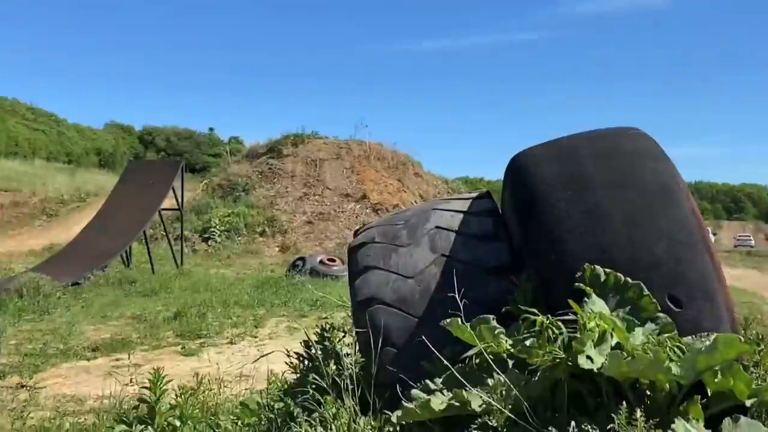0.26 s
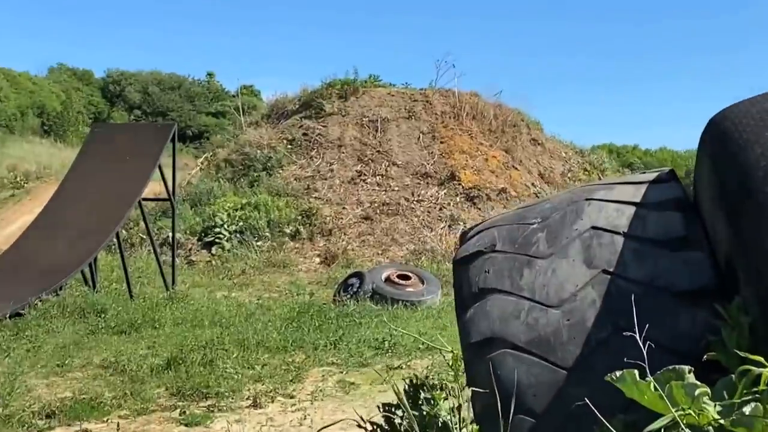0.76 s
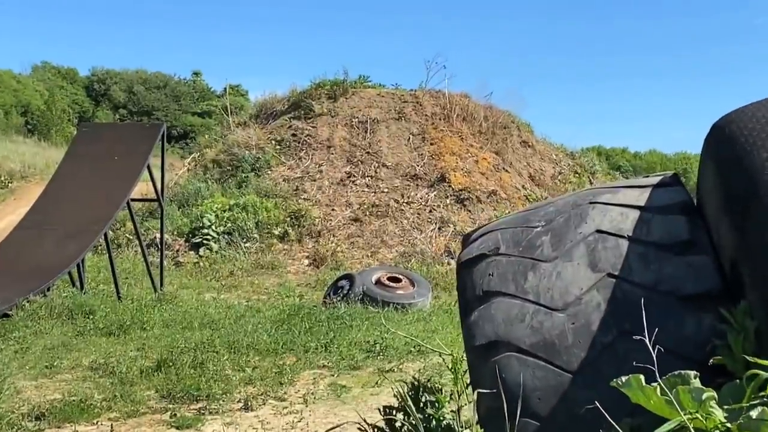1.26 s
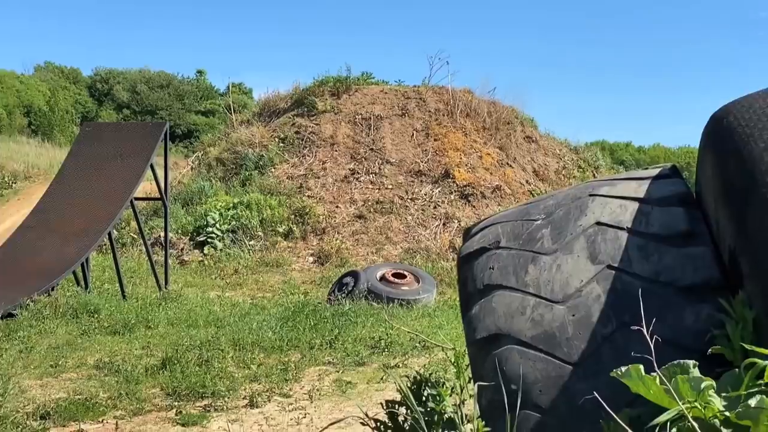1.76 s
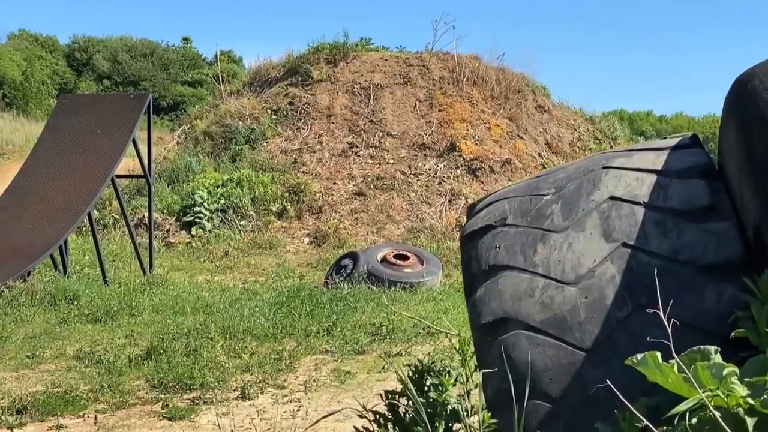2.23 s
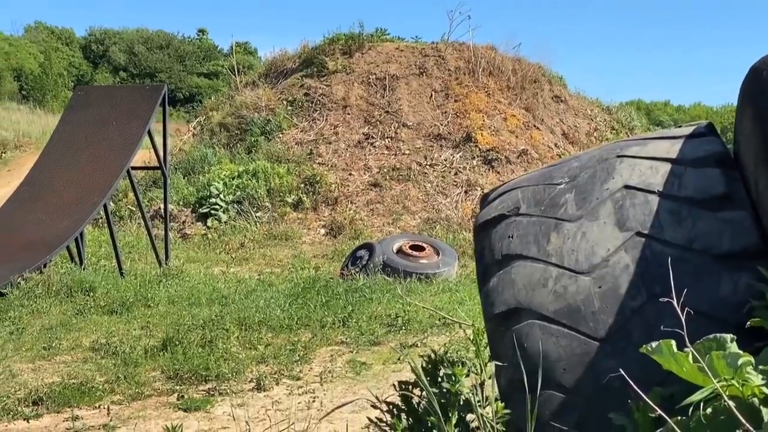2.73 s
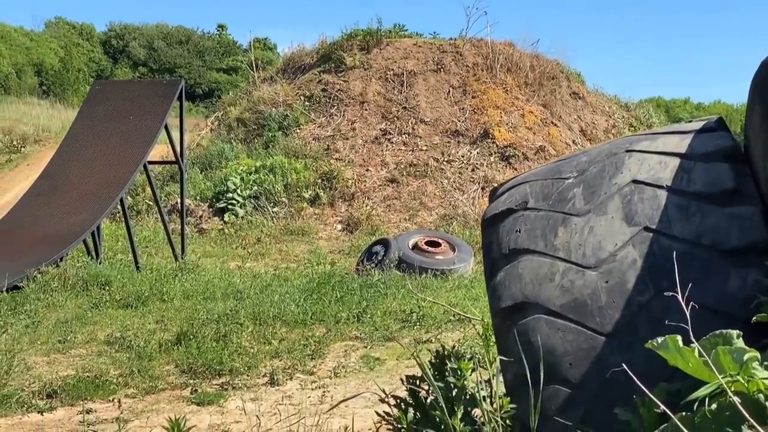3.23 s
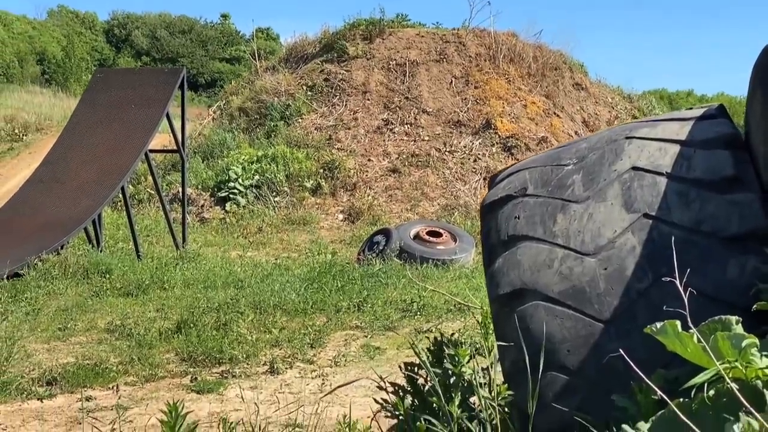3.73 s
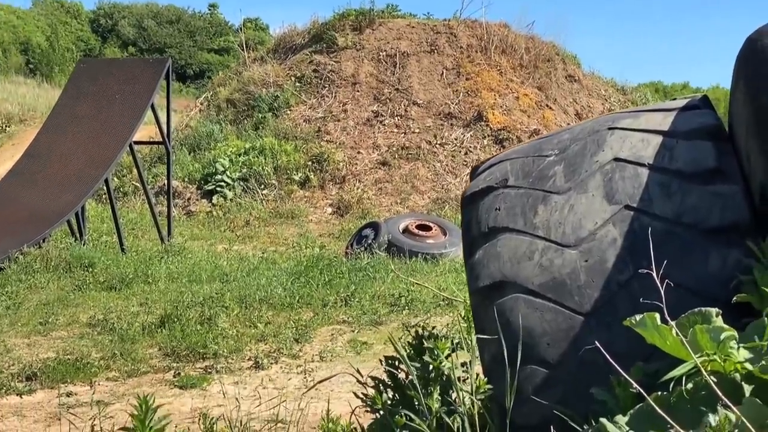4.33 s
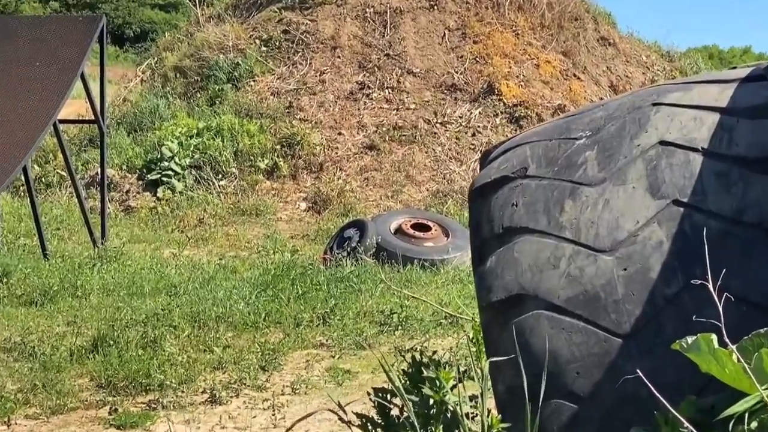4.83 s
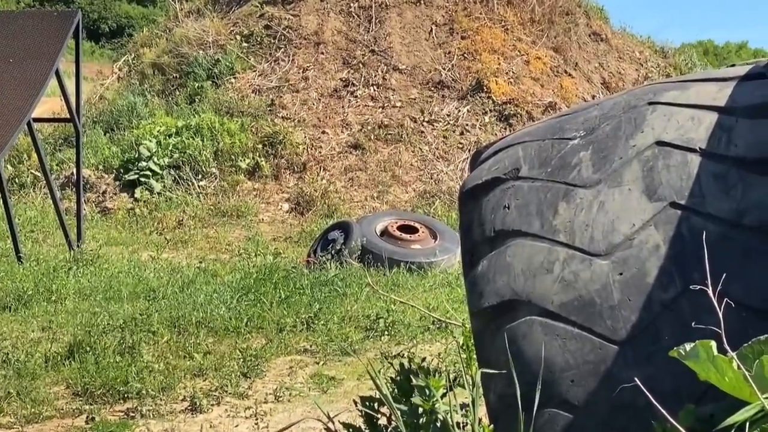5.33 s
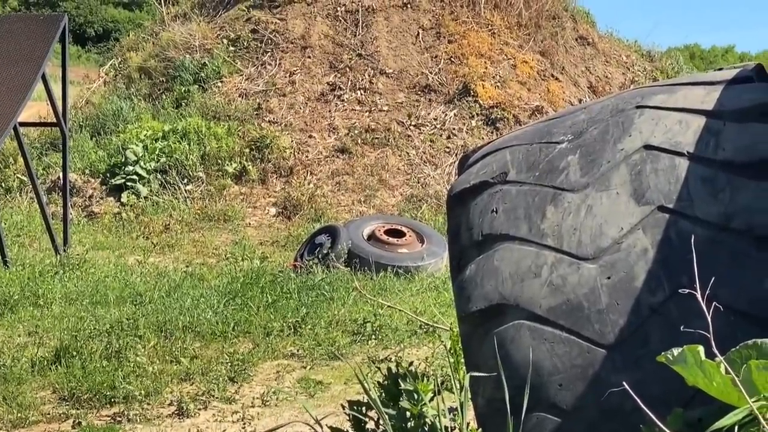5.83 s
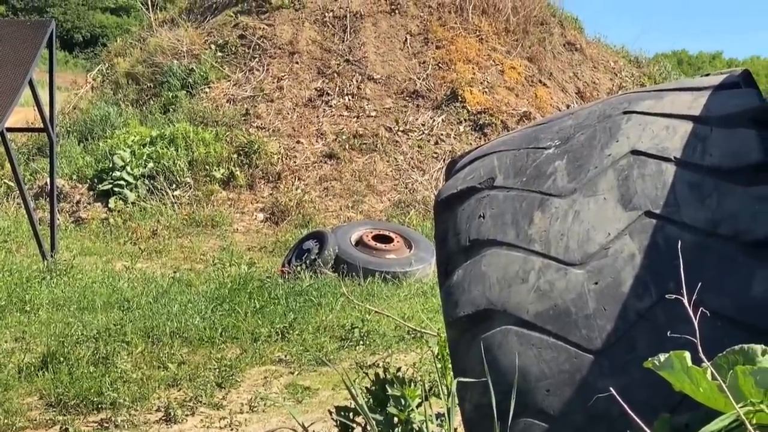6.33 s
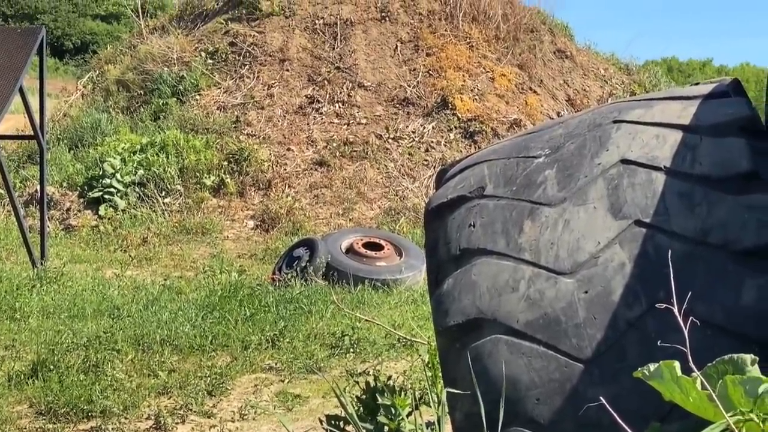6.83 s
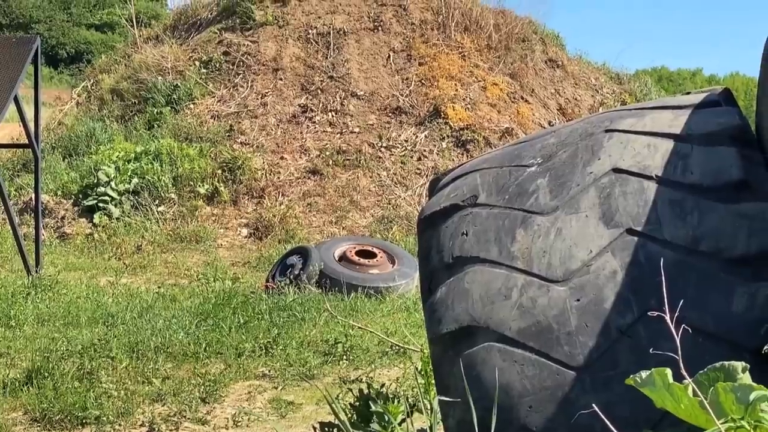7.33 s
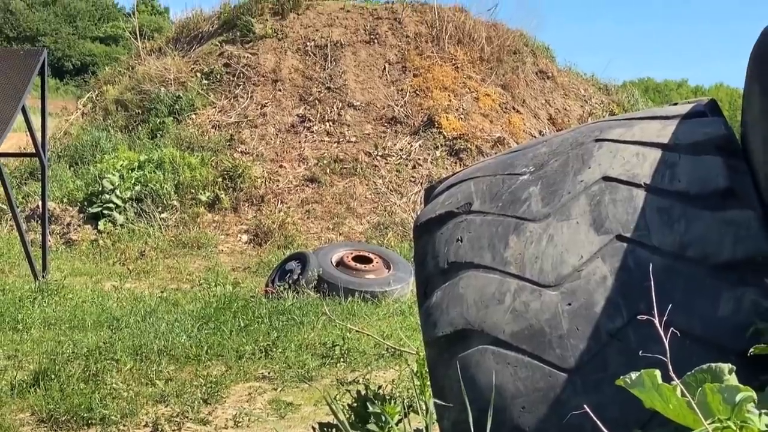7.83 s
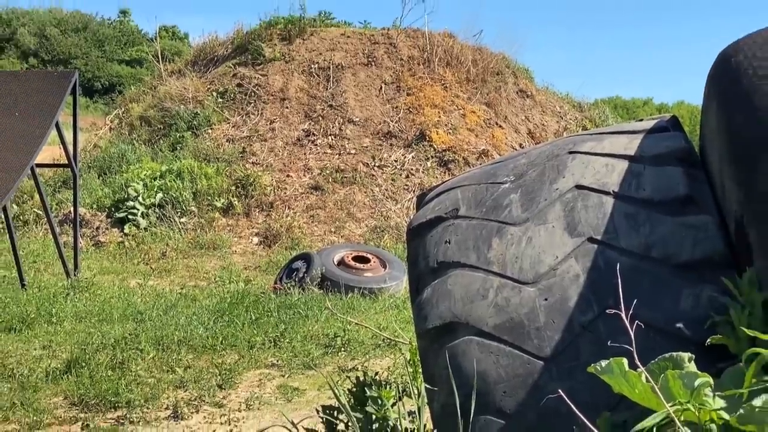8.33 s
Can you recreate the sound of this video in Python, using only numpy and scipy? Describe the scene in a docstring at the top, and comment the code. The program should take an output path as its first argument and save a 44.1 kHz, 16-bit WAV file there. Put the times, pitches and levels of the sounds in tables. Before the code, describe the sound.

In the open air, compressed air hisses through a hose and valve into a large tire. The hiss begins weaker, surges by 0.4 seconds, dips near 0.8, then swells again around 1.3. It is bright and fizzy, with narrow, wavering whistles; a shrill ring leads until about 1.5 seconds, then a lower one takes over as the fitting settles. The flow eases near 3 seconds, recovers by 4, and keeps fluctuating to the end at about 8.6. Behind, a small compressor engine runs steadily at about seventeen cycles a second: metallic knocking, soft exhaust puffs, gear whirr and a low drone. Clatter swells slightly near 1.4; exhaust fades briefly around 6. Wind buffets the microphone with low thumps, strongest near 1.1 seconds, again around 4.6 to 5, and lightly after 7. Wide stereo, dry, no echo.

```python
"""Outdoors, compressed air hisses through a hose and valve into a tire.
One flow drives the jet noise and its rings in the narrow fittings; the fizzy top has its own level curve.
A shrill ring leads at first, then gives way to a lower one as the chuck settles.
The compressor's small engine idles behind: a knock and three exhaust puffs in every cycle.
A few gusts and single eddies buffet the microphones."""
import sys
import numpy as np
from scipy import signal
from scipy.fft import rfft, irfft, next_fast_len
from scipy.io import wavfile
from scipy.ndimage import uniform_filter1d, map_coordinates

SR = 44100
rng = np.random.default_rng(int(sys.argv[2]) if len(sys.argv) > 2 else 0)


def waveform_to_disk(signal):
    """Save audio, clipped to [-1, 1], as 16-bit WAV at the path in sys.argv[1]."""
    frames = np.transpose(np.atleast_2d(signal))
    scaled = np.clip(frames, -1, 1) * 32767
    samples = np.round(scaled).astype(np.int16)
    wavfile.write(sys.argv[1], SR, samples)


N = 378378

# Levels in spectra and resonances are relative unless a comment says otherwise.
# air flow and the fine top of its hiss: time_s, flow_db, treble_db (before FIZZ_DB)
AIR_FLOW = [(0.0, -33.5, -37), (0.4, -21.5, -24.5), (0.48, -22.5, -28.5), (0.76, -27.5, -31),
            (1.31, -23.5, -26.5), (1.48, -25.5, -31.5), (1.79, -24, -27), (2.51, -24.5, -28),
            (2.96, -29.5, -36), (3.94, -25.5, -30), (4.23, -25.5, -31.5), (4.37, -25, -27),
            (4.63, -26.5, -35), (4.97, -28, -31), (5.78, -26, -32), (5.9, -27.5, -35), (6.21, -25, -28.5),
            (6.33, -29, -34), (7.45, -25.5, -30.5), (7.72, -28, -36.5), (7.93, -26, -31.5),
            (8.58, -27.5, -30)]
# broad jet noise: freq_hz, level_db
JET_SPECTRUM = [(1500, -35), (2600, -15), (3300, -4), (4200, -1.5), (5500, 0.5), (7100, -2.5), (7750, -2),
                (8250, -7), (11000, -22), (16000, -40)]
# fine top of the hiss: freq_hz, level_db
FIZZ_SPECTRUM = [(6000, -35), (8200, -5.5), (8800, -2.5), (9200, 0.5), (9700, -2.5), (10300, -1),
                 (11150, -0.5), (11350, -1), (11820, 3.5), (12200, 1.5), (13300, -4), (14100, -6.5),
                 (15000, -9.5), (15800, -16.5)]
# ring of the valve bore, moving as the chuck settles: time_s, pitch_hz
BORE_PITCH = [(0, 5730), (1.2, 5670), (1.7, 5670), (4, 5617), (8.58, 5660)]
# fixed resonances of the fittings: centre_hz, width_hz, level_db
FITTING_MODES = [(3320, 130, -12), (4160, 120, -3), (5130, 130, -1), (5260, 60, -5), (6070, 100, -1),
                 (6250, 110, -1), (6410, 130, -1), (6850, 180, -8)]
# level of the independent hiss that widens the stereo: freq_hz, level_db
STEREO_SPREAD = [(2500, -50), (3400, -27), (4500, -10), (6000, -8), (7200, -20), (9000, -11), (13000, -10),
                 (15500, -22)]

# engine speed: time_s, cycles_per_s
ENGINE_SPEED = [(0.0, 17.28), (0.6, 17.33), (1.3, 17.11), (2.0, 17.3), (2.6, 17.19), (3.3, 17.23),
                (4.0, 17.22), (4.7, 17.25), (5.4, 17.36), (6.1, 17.33), (6.8, 17.15), (7.5, 17.26),
                (8.58, 17.28)]
# exhaust puffs within one cycle: share_of_cycle, level_db
EXHAUST_PUFFS = [(.01, 8.5), (.23, 4), (0.631, -1.5)]
# muffler response: freq_hz, level_db
MUFFLER_SPECTRUM = [(20, -46), (35, -27), (55, -5), (85, 1), (145, -0.5), (185, -6), (240, -18), (330, -15),
                    (430, -32.5), (900, -53.5)]
# engine block resonances: centre_hz, half_width_hz (6 dB down), level_db
BLOCK_MODES = [(716, 150, -6), (895, 145, 10), (1134, 260, 0)]
# engine cover resonances: centre_hz, half_width_hz (6 dB down), level_db
COVER_MODES = [(1840, 145, 1), (2233, 115, 1), (2880, 500, -2)]
# steady whirr of gears and fan: freq_hz, level_db
WHIRR_SPECTRUM = [(25, -30), (60, 4), (200, 2), (320, 2), (390, -1.5), (500, -5.5), (720, 3), (950, 0),
                  (1250, 2), (1500, -7.5), (1850, -2), (2600, -6), (5000, -12.5)]
# boom of the housing: centre_hz, width_hz, level_db
HOUSING_MODES = [(197, 64, 1), (290.4, 47, 2), (415, 28, -7)]
# early swell of the clatter: middle_s, half_width_s, change_db
CLATTER_SWELL = (1.37, 1.0, 2.9)
# brief fade of the exhaust: middle_s, half_width_s, change_db
EXHAUST_FADE = (6.02, .5, -9.5)
# swells of the housing drone: middle_s, half_width_s, change_db
HOUSING_SWELLS = [(.4, .7, 5.5), (5.65, 0.42, 6.5)]

# single eddies that thump the microphone: start_s, level_db, starting pitch_hz, rise_s
EDDIES = [(0.544, -24, 101, .015), (0.744, -25, 86, 0.013), (0.928, -20.5, 148, 0.011),
          (1.071, -21, 125, 0.0061), (1.1035, -18, 470, .0045), (1.106, -11, 244, 0.0061),
          (1.236, -23.5, 230, .0077), (4.62, -29.5, 380, 0.0082), (4.826, -21.5, 128, 0.014),
          (4.85, -24, 248, .008), (5.046, -22, 157, .0096), (7, -24, 162, 0.012),
          (7.48, -21.5, 129, 0.0072)]
# gusts on the microphone: start_s (of the hold), length_s, level_db
GUST_EVENTS = [(0, 0.68, -37), (.97, .43, -31.5), (2.6, .06, -46), (4.577, 0.53, -33), (7.1, .63, -35.5),
               (8.05, .5, -44.5)]
# low wind buffeting: freq_hz, level_db
RUMBLE_SPECTRUM = [(18, -28), (35, -4.5), (62, 2), (110, 0.5), (190, -7.5), (330, -23), (600, -37),
                   (1500, -68)]
# stereo phase, left ahead of right: freq_hz, phase_rad
STEREO_PHASE = [(60, 0), (400, .7), (900, 1.7), (1150, 1), (1480, 1.2), (1720, .15), (2000, 0), (2750, 0),
                (3300, .2), (4000, .3), (4900, .7), (5450, 0), (5950, -.8), (6550, 0), (7850, 0), (8150, 2),
                (9200, 1.8), (10200, .7), (10600, 0), (11100, 0), (13200, -3), (14300, -3.6), (14600, -4.8),
                (15200, -6.28)]

USUAL_FLOW_DB = -26.5
# each part of the hiss: level at the usual flow, and dB gained per dB of flow
JET_DB, JET_GROWS = -31.6, 0.7
FITTINGS_DB, FITTINGS_GROWS = -33.5, 1.15
BORE_DB, BORE_GROWS = -34.5, 0.7
LOWER_DB, LOWER_GROWS = -33.5, 1.25
UPPER_DB, UPPER_GROWS = -35, 0.75
FIZZ_DB = 2.07  # added to treble_db
# the chuck settles; while loose, the upper ring is stronger and the other rings weaker
SETTLE_S, SETTLE_TAKES_S = 1.5, 0.11
LOOSE_UPPER_DB, LOOSE_LOWER_DB, LOOSE_OTHERS_DB = 4.5, -7, -2.5
# engine levels before their swells
KNOCK_DB, EXHAUST_DB, DRONE_DB = -42.8, -38.7, -50.5
GUST_ATTACK_S, GUST_RELEASE_S, BREEZE_DB = 0.18, 0.14, -49.5
TOP_HZ = 15750


def air():
    """The turbulent jet hisses and excites narrow resonances of valve and chuck, each growing with the flow."""
    strength_db, treble_db = curves(AIR_FLOW)
    flow_db = strength_db - USUAL_FLOW_DB
    loose = 0.5 - 0.5 * np.tanh((np.arange(N) / SR - SETTLE_S) / SETTLE_TAKES_S)
    rings, fittings = fitting_rings(flow_db, loose)
    # moving air makes the highest hiss swell and fade
    fading_db = 0.88 * wobble(10)
    jet = amp(JET_DB + JET_GROWS * flow_db) * noise(JET_SPECTRUM)
    fizz = amp(FIZZ_DB + treble_db + fading_db) * noise(FIZZ_SPECTRUM)
    # broad colour shifts first, then narrow patches that come and go like thin whistles
    shifting = patchy(jet + fizz + fittings, depth_db=1.35, size=(12, 20))
    hiss = patchy(shifting + rings, depth_db=2.0, size=(2, 16))
    flutter = amp(0.29 * wobble(25) + 0.3 * wobble(130))
    return flutter * hiss


def fitting_rings(flow_db, loose):
    """Narrow passages ring under the flow: three wavering whistles, and a cluster of fixed resonances."""
    bore_hz, = curves(BORE_PITCH)
    upper_hz = 4845 * bore_hz / bore_hz.mean()  # moves in step with the bore
    lower_db = LOWER_DB + LOWER_GROWS * flow_db + LOOSE_LOWER_DB * loose
    upper_db = UPPER_DB + UPPER_GROWS * flow_db + LOOSE_UPPER_DB * loose
    bore_db = BORE_DB + BORE_GROWS * flow_db + LOOSE_OTHERS_DB * loose
    fittings_db = FITTINGS_DB + FITTINGS_GROWS * flow_db + LOOSE_OTHERS_DB * loose
    lower = amp(lower_db) * whistle(4480, width=206, waver=20)
    upper = amp(upper_db) * whistle(upper_hz, width=170, waver=20)
    bore = amp(bore_db) * whistle(bore_hz, width=235, waver=20)
    return lower + upper + bore, amp(fittings_db) * ringing_noise(FITTING_MODES)


def engine():
    """Knocking metal, exhaust puffs and a droning housing make up the compressor's engine."""
    return machinery() + exhaust() + housing_drone()


def machinery():
    """Combustion knocks the block, then the covers, over a whirr of gears and fan."""
    block_blows = strokes(-0.085, scatter_db=1.0, jitter=0.008)
    cover_blows = strokes(-0.055, scatter_db=1.3, jitter=0.008)
    block_hits = rattle(block_blows, rattle_db=-19.5, t60=0.027, tail_db=-3.5, tail_t60=0.11)
    cover_hits = rattle(cover_blows, rattle_db=-19.5, t60=0.04, tail_db=-2.5, tail_t60=0.15)
    knock = amp(-4.5) * ringing(block_hits, BLOCK_MODES) + amp(-5.0) * ringing(cover_hits, COVER_MODES)
    whirr = amp(1) * patchy(noise(WHIRR_SPECTRUM), depth_db=0.97, size=(3, 30))
    whine = amp(-13) * whistle(328, width=7.8, waver=0.89)
    return amp(KNOCK_DB + swell(*CLATTER_SWELL)) * (knock + whirr + whine)


def exhaust():
    """Three pressure puffs per cycle pass through the muffler, which rings after each."""
    puffs = sum(amp(db) * strokes(share, scatter_db=1.1, jitter=0.004) for share, db in EXHAUST_PUFFS)
    muffled = unit(filtered(puffs, lambda hz: causal(MUFFLER_SPECTRUM, hz)))
    return amp(EXHAUST_DB + swell(*EXHAUST_FADE)) * muffled


def housing_drone():
    """The housing booms: noise gathered in its low resonances, with two swells."""
    level_db = DRONE_DB + sum(swell(*row) for row in HOUSING_SWELLS)
    return amp(level_db) * ringing_noise(HOUSING_MODES)


def thumps():
    """An eddy strikes the microphone: a few low cycles that swell, sink in pitch and die."""
    out = np.zeros(N + SR)
    t = np.arange(SR // 4) / SR
    for start_s, db, hz, rise_s in EDDIES:
        u = t / rise_s
        phase = 2 * np.pi * np.cumsum(hz / (1 + 0.5 * u)) / SR
        envelope = (u * np.exp(1 - u)) ** 1.3  # peaks at u = 1
        out[round(start_s * SR):][:len(t)] += amp(db) * envelope * np.sin(phase)
    return out[:N]


def wind():
    """Gusts rise, hold and drop over a light breeze: lumpy low buffeting, partly different left and right."""
    t = np.arange(N) / SR
    strength = amp(BREEZE_DB)
    for start_s, length_s, db in GUST_EVENTS:
        end_s = start_s + length_s
        corners_s = [start_s - GUST_ATTACK_S, start_s, end_s, end_s + GUST_RELEASE_S]
        strength = strength + amp(db) * np.interp(t, corners_s, [0, 1, 1, 0])
    shared = noise(RUMBLE_SPECTRUM) * amp(2.6 * wobble(16))
    own = np.array([noise(RUMBLE_SPECTRUM) * amp(4.3 * wobble(14)) for side in range(2)])
    return strength * unit(shared + amp(-1.5) * own)


def whistle(centre_hz, width, waver):
    """A band of noise, width in Hz, whose centre wanders smoothly; waver scales the wander in Hz."""
    a, b = filtered(rng.standard_normal((2, N)), lambda f: 1 / (1 + (2 * f / width) ** 4) ** 0.5)
    phase = 2 * np.pi * np.cumsum(centre_hz + waver * wobble(5)) / SR
    return unit(a * np.cos(phase) + b * np.sin(phase))


def ringing_noise(modes):
    """Noise of rms 1 gathered in (centre_hz, width_hz, level_db) resonances."""
    def response(f):
        return np.sqrt(sum(amp(db) ** 2 / (1 + (2 * (f - c) / w) ** 4) for c, w, db in modes))
    return unit(filtered(rng.standard_normal(N), response))


def noise(spectrum):
    """Noise of rms 1 with this spectrum."""
    return unit(filtered(rng.standard_normal(N), lambda hz: amp(along(spectrum, hz))))


def patchy(x, depth_db, size):
    """x under a drifting random colour; size = (bins, frames) of the smoothing, applied twice."""
    z = signal.stft(x, nperseg=2048)[2]
    field = rng.standard_normal(z.shape)
    for axis in (0, 1, 0, 1):
        field = uniform_filter1d(field, size[axis], axis)
    return signal.istft(z * amp(depth_db * unit(field)), nperseg=2048)[1][:N]


def strokes(share, scatter_db, jitter):
    """One impulse per engine cycle, at this share of it, uneven in size and time (jitter in cycles)."""
    turns = np.cumsum(curves(ENGINE_SPEED)[0]) / SR
    size, slip = rng.standard_normal((int(turns[-1]), 2)).T
    at = np.interp(np.arange(len(size)) + 1 + share + jitter * slip, turns, np.arange(N))
    inside = at < N - 1
    return np.bincount(at.astype(int), amp(scatter_db * size) * inside, N)


def rattle(blows, rattle_db, t60, tail_db, tail_t60):
    """Each blow is a clean strike plus a burst of noise with a longer tail; decay times in seconds."""
    t = np.arange(SR // 4) / SR
    shape = amp(-60 * t / t60) + amp(tail_db - 60 * t / tail_t60)
    burst = signal.fftconvolve(blows, shape)[:N] * rng.standard_normal(N)
    return blows + amp(rattle_db) * burst


def ringing(x, modes):
    """x through (centre_hz, half_width_hz, level_db) resonances, at rms 1."""
    def response(f):
        return sum(amp(db) * (1j * f * 2 * w / (c * c - f * f + 2j * f * w)) ** 2 for c, w, db in modes)
    return unit(filtered(x, response))


def causal(points, hz):
    """A minimum-phase response with this spectrum: it rings only after the blow."""
    cepstrum = irfft(np.log(amp(along(points, hz))))
    half = len(cepstrum) // 2
    return np.exp(rfft(np.r_[cepstrum[0], 2 * cepstrum[1:half], np.zeros(half)]))


def filtered(x, response):
    """x times a complex response of frequency."""
    size = 2 * next_fast_len(N // 2 + SR // 4)
    return irfft(rfft(x, size) * response(np.fft.rfftfreq(size, 1 / SR)), size)[..., :N]


def swell(middle_s, width_s, db):
    """A smooth rise and fall in dB, or a dip if db is negative, one value per sample."""
    return db * np.exp(-((np.arange(N) / SR - middle_s) / width_s) ** 2)


def wobble(rate):
    """A smooth random curve, rate knots a second."""
    knots = rng.standard_normal(4096)
    return map_coordinates(knots, [np.arange(N) * rate / SR], mode="wrap")


def curves(rows):
    """One value per sample for each column after the time."""
    s, *cols = np.transpose(rows)
    return [np.interp(np.arange(N) / SR, s, c) for c in cols]


def along(points, hz):
    """(freq_hz, value) points read on a log frequency axis."""
    f, v = np.transpose(points)
    return np.interp(np.log(hz + 1), np.log(f + 1), v)


def amp(db):
    """Decibels to gain."""
    return 10 ** (np.asarray(db) / 20)


def unit(x):
    """x at rms 1."""
    return x / np.sqrt(np.mean(x ** 2) + 1e-20)


def scene():
    """Air and engine are spread over left and right by a phase curve; their midrange leans left."""
    sides = np.array([[0.5], [-0.5]])  # left, right
    # level of left over right: freq_hz, level_db
    lean = [(120, -2.5), (350, 1.5), (800, 3.4), (1450, 2.8), (1750, 0)]

    def to_stereo(hz):
        return np.exp(1j * sides * along(STEREO_PHASE, hz)) * amp(sides * along(lean, hz))

    centre = filtered(air() + engine(), to_stereo)
    # independently drawn hiss, opposite in sign left and right
    spread = sides * filtered(air(), lambda hz: amp(along(STEREO_SPREAD, hz)))
    return centre + spread + thumps() + wind()


def record(dry):
    """The recorder keeps nothing above its band limit."""
    return filtered(dry, lambda hz: hz < TOP_HZ)


dry = scene()
out = record(dry)
waveform_to_disk(out)
```